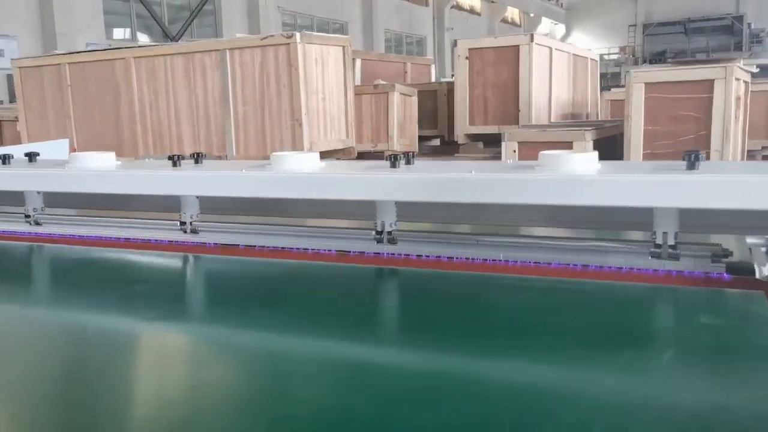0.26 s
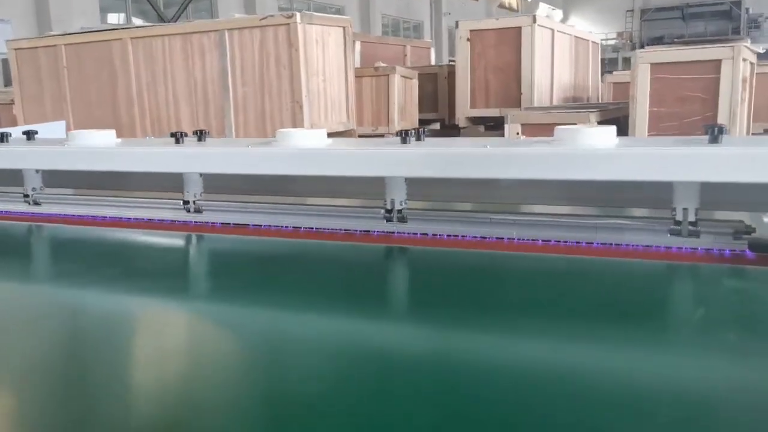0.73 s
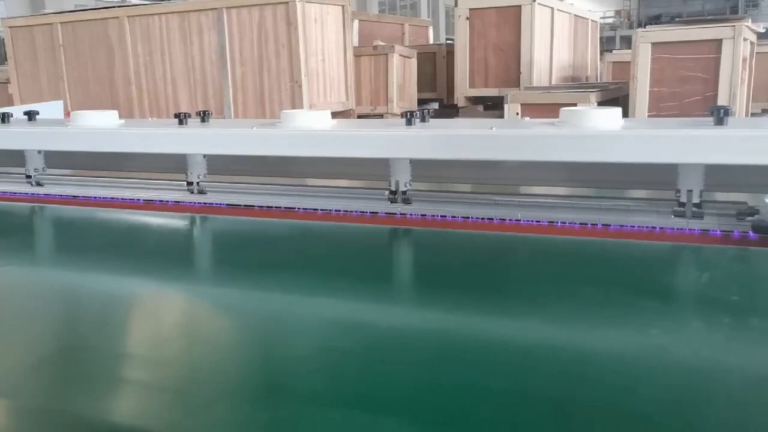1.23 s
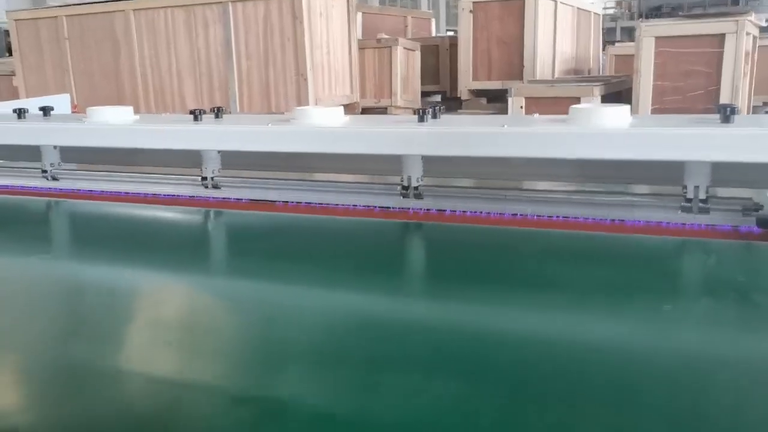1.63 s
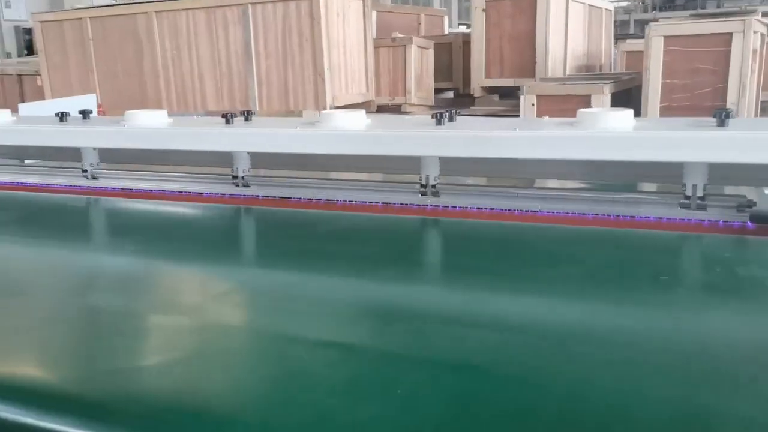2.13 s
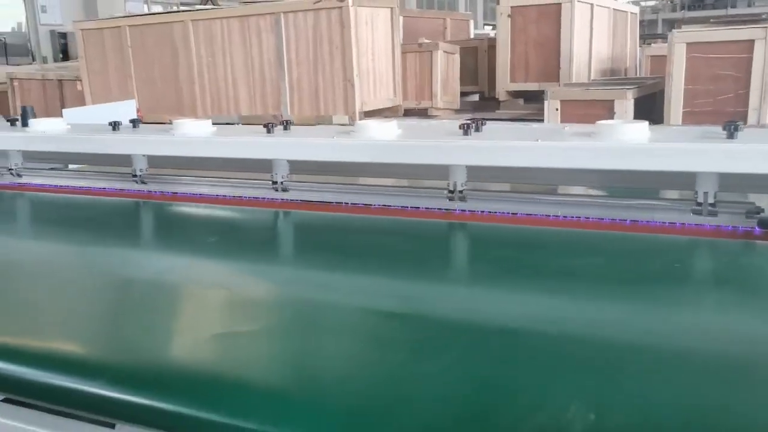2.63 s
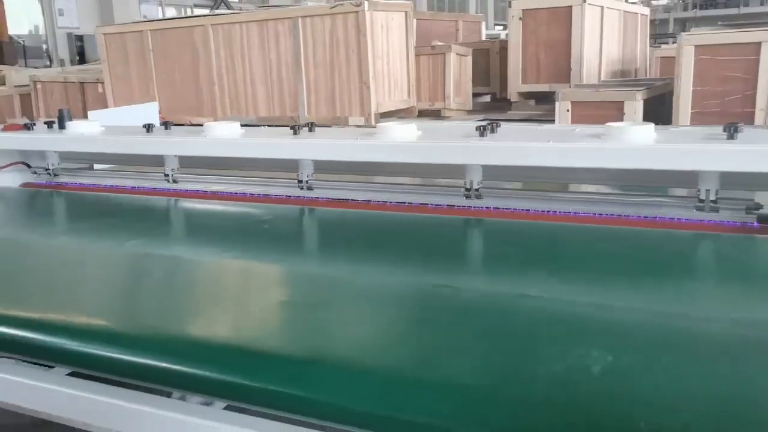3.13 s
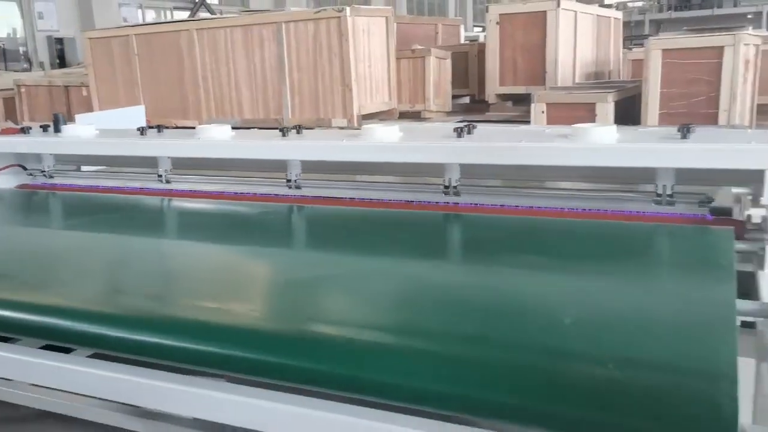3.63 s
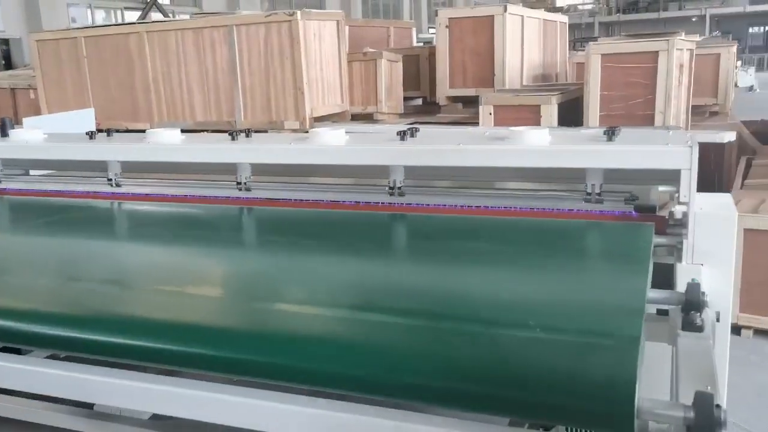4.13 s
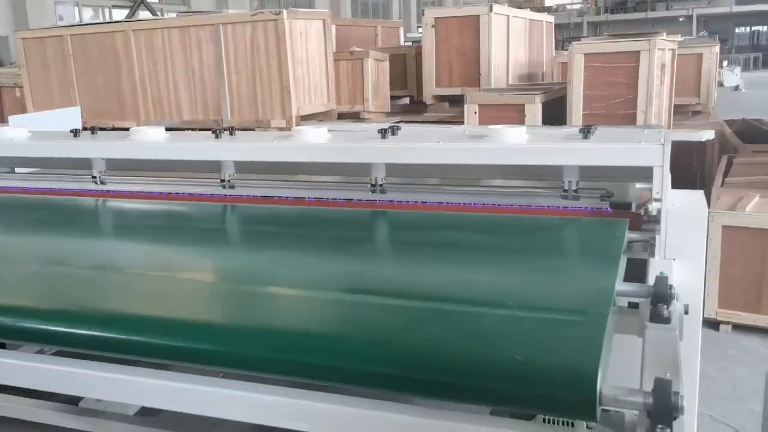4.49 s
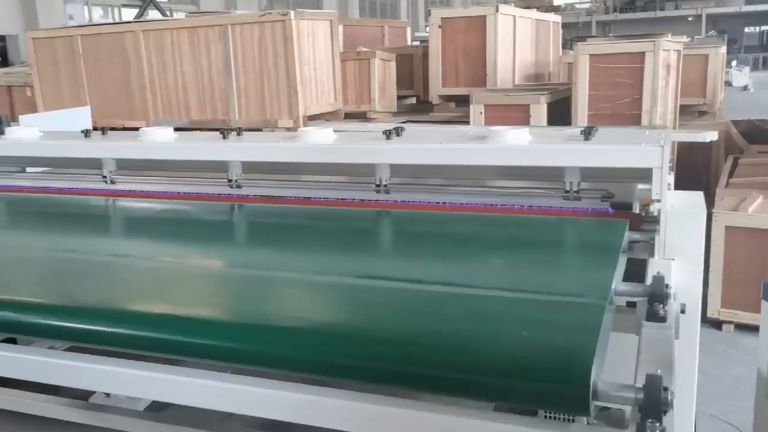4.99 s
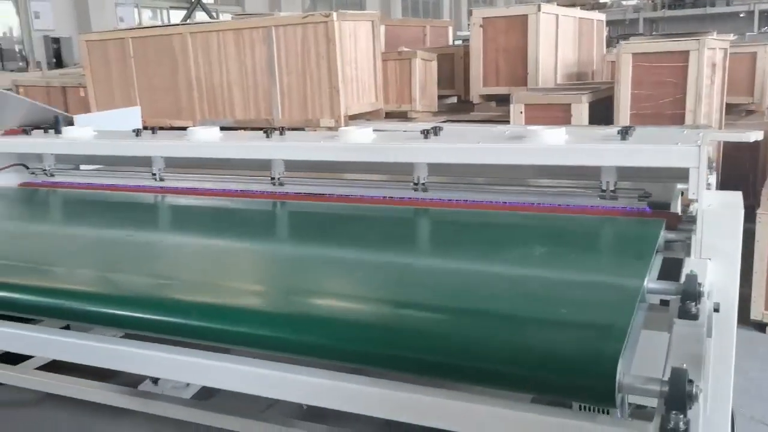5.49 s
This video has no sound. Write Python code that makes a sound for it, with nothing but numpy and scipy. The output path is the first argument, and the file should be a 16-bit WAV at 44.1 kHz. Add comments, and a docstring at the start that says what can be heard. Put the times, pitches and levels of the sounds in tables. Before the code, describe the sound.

A steady electrical hiss and piercing thin whine fill a factory hall; wind buffets the microphone, then three echoing air nailer shots ring out.

```python
"""Corona discharge and air nailer in a factory hall

A corona treater runs in a large hall: random snaps along its electrode make the hiss, a swept tone with
overlapping reflections makes the generator's whine, and drifting sines over filtered noise make the motors' hum.
Air buffets the moving hand-held microphone, as filtered noise and short, steepened sine pulses, one a handling knock.
An air nailer fires three times into a crate: blows ring damped modes, decaying noise fills the hall,
and a puff of exhaust follows each shot."""
import sys
import numpy as np
from scipy import signal
from scipy.fft import rfft, irfft
from scipy.io import wavfile
from scipy.ndimage import uniform_filter1d, minimum_filter1d

SR = 44100
rng = np.random.default_rng(int(sys.argv[2]) if len(sys.argv) > 2 else 0)


def transcribe(u):
    """Save the signal u as a 16-bit wav file named by the first command-line argument.

    u: samples, shape (n,) or (channels, n), limited to [-1, 1]; the rate is SR.
    q: integer samples, one column per channel.
    """
    v = np.clip(np.atleast_2d(u).T, -1, 1)
    q = np.round(v * 32767).astype(np.int16)
    wavfile.write(sys.argv[1], SR, q)


N = 253575
T = np.arange(N) / SR  # time_s
FREQ = np.maximum(np.fft.rfftfreq(2 * N, 1 / SR), 1)  # frequency_hz, padded to twice the length

# Whine level, balance and directness over time, with a sudden drop after the first shot;
# levels before an overall trim: time_s, level_db, left_minus_right_db, direct_over_reflected_db
WHINE_LEVEL = [(0, -17, -6, -14), (.7, -15.5, -2.5, -5), (1.2, -17.5, -7.5, -9), (1.5, -15, -4.5, -5),
               (1.85, -16.5, 1, 5), (2.3, -17.5, -3, -1), (2.65, -19, -1, 1), (3.05, -21, 0, 0.5),
               (3.51, -19, 1, -11), (3.55, -24.5, 1, 1), (4.4, -25, 0, -15), (5.1, -23, -3.5, -16),
               (5.75, -24, 2.5, -14)]
# Middle of the generator's drifting sweep: time_s, centre_hz
SWEEP_CENTRE = [(1.3, 12295), (2.1, 12365), (4, 12330), (5.75, 12375)]
# How openly the spark gap faces the microphone: time_s, sizzle_level_db
GAP_FACING = [(0, -31), (.35, -29), (1.2, -27), (1.35, -27), (1.52, -32.5), (2.8, -32), (3.3, -34),
              (3.9, -33), (5.75, -33)]
# Relative spectra of the hiss and of the sizzle: frequency_hz, gain_db
HISS_SPECTRUM = [(300, 5), (1000, -8.5), (1600, 5.5), (2400, 6.5), (3100, 4), (4000, 1.5), (7000, 1),
                 (11000, 1.5), (16000, 4.5), (19000, -47)]
SIZZLE_SPECTRUM = [(500, -15), (1150, 9), (1400, 2.5), (1700, 9.5), (3500, -1), (5000, 5), (7500, 0.5),
                   (9000, -5), (10300, 1.5), (13000, 0), (16000, -12), (19000, -25)]
# Motors and blowers, levels before an overall trim: frequency_hz, level_db
MOTOR_TONES = [(226.1, -50), (301.5, -49.5), (452.2, -54), (532.9, -53), (630.5, -47.5), (720, -56.5),
               (829.0, -47), (899.0, -53), (931.3, -47), (1200, -50), (1798, -53.5)]
# Motors and blowers as the microphone moves past them: time_s, gain_db
MOTOR_NEARNESS = [(0, 4.5), (1.4, 4), (2.0, 1), (3.2, 0.5), (4.2, 3), (5.75, 2)]
# Relative spectrum of the hall's rumble: frequency_hz, gain_db
RUMBLE_SPECTRUM = [(20, -38), (55, -12), (160, -10), (260, 3), (430, -6.5), (620, 2.5), (760, -2),
                   (900, 4.5), (1030, -5), (1190, 6), (1400, -3.5), (3000, -17), (8000, -50)]
# Relative spectrum of air on the ports: frequency_hz, gain_db
DRAUGHT_SPECTRUM = [(15, -40), (25, -23), (38, 1.5), (65, 1.5), (135, -1), (250, -16), (450, -31),
                    (900, -28), (3000, -70)]
# Single buffets of air and one handling knock (at 1.831 s), each with a nominal pitch:
# centre_s, level_db, left_minus_right_db, pitch_hz
THUDS = [(.32, -27, 18, 86.3), (.8, -24.5, 14, 65.6), (.84, -24, 17, 80.7), (1.826, -23.5, 17, 142),
         (1.831, -19, 17, 476), (2.105, -26.5, 17, 104), (2.135, -23, 22, 198), (2.398, -18.5, 24, 112.4),
         (2.445, -24, 20, 148.5), (2.514, -20.5, 22, 150), (2.615, -22, 16, 329.3),
         (2.677, -23.5, 18, 124.5), (2.738, -23, -17, 118), (2.767, -19, 19, 204.5), (2.826, -13, 21, 138),
         (2.842, -17.5, 18, 219), (2.857, -14.5, 13, 125), (2.871, -22, 18, 365), (2.915, -15.5, 24, 114.5),
         (2.985, -20, 14, 170), (3.014, -21, 20, 620), (3.017, -12, 26, 193.8), (3.037, -13, 22, 109),
         (3.039, -20, 18, 415), (3.09, -23, 10, 94), (3.11, -19.5, -17, 132.3), (3.138, -13, -22, 108),
         (3.185, -19, 22, 131.2), (3.28, -16.5, 22, 159.5), (3.445, -21, 14, 103), (4.585, -7.5, 29, 199.4),
         (4.588, -17, 22, 421.7), (4.61, -14.5, 28, 173)]
# Nailer shots: start_s, hall_db, singing_air_db, exhaust_delay_s, exhaust_db, exhaust_rise_s, piston_tap_db
NAILER_SHOTS = [(3.523, -18, -38, 0.22, -20, 0.0017, -1.5), (4.387, -17, -27.5, 0.21, -19, 0.013, -22),
                (5.237, -17, -37, 0.21, -19.5, 0.016, -20)]
# Blows of each shot, from trigger valve to seated nail: start_s, relative_level_db
NAILER_BLOWS = [(3.499, -27), (3.523, -20.5), (3.5307, -9.5), (3.537, -16.5), (4.365, -26), (4.3884, -12.5),
                (4.394, -15), (4.398, -13), (5.214, -30), (5.239, -15), (5.2434, -21.5), (5.2475, -10.5),
                (5.254, -27)]
# Modes of nailer body and crate board, struck at a new spot each time, relative levels:
# frequency_hz, width_hz, left_minus_right_db, first_shot_db, second_shot_db, third_shot_db
BODY_MODES = [(185, 270, 6, 5, 8, 7.5), (400, 114, 2, 15, 17.5, 17), (944, 100, 19, 5, 14.5, 11),
              (1270, 110, 11, 4, 3, 2), (1783, 120, -10, 12.5, 19, 15.5), (2303, 79, -3, 15, 19.5, 23.5),
              (2797, 105, -21, 9, 13, 15.5), (3603, 84, -23, 10, 15, 16.5), (3890, 88, -11, 9, -2, -6),
              (6350, 110, 4, 0, 11, 7), (7206, 55, 11, 15, 7, 12), (8000, 130, 4, 2, 10, 11)]
# First slaps from crates and walls: delay_s, level_db
WALL_SLAPS = [(.042, -11), (.071, -18), (.113, -16.5)]
# Relative spectra of the hall's reverberation and of the exhaust: frequency_hz, gain_db
REVERB_SPECTRUM = [(50, -4), (100, -2.5), (160, 7.5), (235, 2.5), (300, 4), (420, -6), (540, -4),
                   (640, 1.5), (740, 5.5), (920, 8), (1180, 1), (1330, 4.5), (1500, 0), (2000, 2.5),
                   (2300, 4), (2650, 0), (3800, -4.5), (5300, -24), (6450, -8), (7200, -10), (16000, -21)]
EXHAUST_SPECTRUM = [(300, -41), (1500, 9.5), (3000, 9.5), (5000, 8), (8000, 10), (11000, 10.5),
                    (15800, 10.5), (19000, -13)]
# Cavity resonances of the two microphone ports: frequency_hz, left_db, right_db
PORT_RESPONSE = [(920, -5, -4.5), (1936, -8.5, -6.5), (3505, 0.5, 4.5), (4320, 6, 8), (4490, -0.5, 6),
                 (5030, -3, -6.5), (5470, 0.5, -0.5), (7960, 5.5, 4), (8600, 13, 1.5), (9070, 15.5, 7.5),
                 (9990, 2.5, 1.5), (11960, 3.5, 5), (16300, -2, 0.5)]

HALL_T60_S, HALL_T60_HIGH_S = 1.83, 1


def undb(db):
    """Level: decibels become an amplitude ratio."""
    return 10 ** (np.asarray(db) / 20)


def unit(x):
    """Normalisation: the signal is scaled to rms 1."""
    return x / np.sqrt(np.mean(x ** 2))


def curves(rows):
    """Linear interpolation: each column of a table becomes a function of time."""
    s, *columns = np.transpose(rows)
    return [np.interp(T, s, c) for c in columns]


def place(db, pan_db):
    """Stereo level difference: left and right gains share a constant total power."""
    pair = undb(np.array([pan_db, -pan_db]).reshape(2, -1) / 2)
    return undb(db) * pair / np.sqrt(np.mean(pair ** 2, axis=0))


def shape(x, response):
    """Linear filtering: the spectrum is multiplied by a frequency response."""
    return irfft(rfft(x, 2 * N) * response)[..., :N]


def colour(x, points):
    """Spectral colouring: gain in dB runs straight between points on a log frequency axis."""
    hz, db = np.transpose(points)
    return shape(x, undb(np.interp(np.log(FREQ), np.log(hz), db)))


def resonance(hz, width):
    """Damped resonance: the response of one mode peaks at hz with the given width."""
    return 1 / (1 + 1j * hz / width * (FREQ / hz - hz / FREQ))


def noise():
    """Incoherence: unrelated white noise at the two ports."""
    return rng.standard_normal((2, N))


def diffuse(alike_hz=950):
    """Diffuse field: long waves reach both ports largely alike, short waves independently."""
    likeness = .8 / (1 + (FREQ / alike_hz) ** 6)
    mid, side = shape(noise(), np.sqrt([1 + likeness, 1 - likeness]))
    return np.array([mid + side, mid - side]) / np.sqrt(2)


def walk(rate):
    """Random modulation: held random values, smoothed twice, wander with rms 1."""
    k = max(int(SR / rate), 2)
    held = np.repeat(rng.standard_normal(N // k + 1), k)
    return unit(uniform_filter1d(uniform_filter1d(held, k), k)[:N])


def burst(start, rise_s, t60):
    """Exponential decay: an envelope rises and then falls by 60 dB in each t60."""
    age = np.maximum(T - start, 0)
    return (1 - np.exp(-age / rise_s)) * undb(-60 * np.minimum(age / t60, 4))


def whine(sweep_hz=44.28, swing_hz=210, uneven=.1, hunt_hz=38, flutter_db=1.0,
          shortest_path_s=.003, longest_path_s=.07, sway_s=.00003, count=12,
          skirt_db=-14, skirt_hz=300, trim_db=-0.8, dip_s=2.03, dip_width_s=.013, dip_db=-8):
    """Multipath interference: a swept tone and its delayed reflections overlap into a shimmer."""
    db, pan_db, direct_db = curves(WHINE_LEVEL)
    (centre_hz,) = curves(SWEEP_CENTRE)
    sweep_phase = 2 * np.pi * np.cumsum(sweep_hz * (1 + uneven * walk(25))) / SR
    sweep = signal.sawtooth(sweep_phase, .5)  # triangle wave
    # the uneven spark load tugs at the pitch
    pitch_hz = centre_hz + swing_hz * sweep + hunt_hz * walk(400)
    phase = 2 * np.pi * np.cumsum(pitch_hz) / SR

    def path(delay_s):
        """Doppler effect: every sway of the hand changes the path length to each port."""
        sent = [np.abs(T - delay_s + sway_s * walk(12)) for _ in range(2)]
        return np.sin(np.interp(sent, T, phase)) * undb(flutter_db * np.interp(sent, T, sweep))

    spread = (np.arange(count) + .5 * rng.random(count)) / count
    delays_s = shortest_path_s + (longest_path_s - shortest_path_s) * spread
    reflected = unit(sum(path(delay_s) for delay_s in delays_s))
    direct = undb(direct_db) * unit(path(0))
    tone = (direct + reflected) / np.hypot(undb(direct_db), 1)
    # stray sparks spread a skirt around the tone
    skirt = unit(shape(noise(), 1 / np.hypot(1, (FREQ - centre_hz.mean()) / skirt_hz)))
    # the whine dips briefly
    brief_dip_db = dip_db * np.exp(-((T - dip_s) / dip_width_s) ** 2)
    return (tone + undb(skirt_db) * skirt) * place(db + trim_db + brief_dip_db, pan_db)


def sparks(per_second, scatter_db):
    """Shot noise: dense tiny snaps of uneven size fall at random instants."""
    struck = rng.random((2, N)) < per_second / SR
    return struck * noise() * undb(scatter_db * rng.standard_normal((2, N)))


def discharge(flicker_db=0.5, surge_db=1.1, sizzle_pan_db=1.0,
              hiss_db=-27.5, drop_s=3.6, drop_length_s=0.25, drop_db=-2):
    """Corona discharge: random snaps sum to a hiss, with a sharper sizzle where the gap is in plain view."""
    (facing_db,) = curves(GAP_FACING)
    # the hiss drops slightly once, as if the recorder turned its gain down
    dropped = np.clip((T - drop_s) / drop_length_s, 0, 1)
    hiss = unit(colour(sparks(28000, 0.5), HISS_SPECTRUM)) * undb(hiss_db + drop_db * dropped)
    sizzle = unit(colour(sparks(8000, 2.4), SIZZLE_SPECTRUM))
    sizzle = sizzle * place(facing_db + surge_db * walk(20), sizzle_pan_db)
    return (hiss + sizzle) * undb(flicker_db * walk(45))


def machinery(trim_db=-0.47, drift_hz=0.72, phase_wander_rad=0.24, rumble_db=-40.0, boom_hz=380):
    """Superposition: motor tones of drifting phase lie over a rumble whose bass is the same everywhere."""
    (near_db,) = curves(MOTOR_NEARNESS)
    rumble = unit(colour(diffuse(), RUMBLE_SPECTRUM)) * undb(rumble_db)
    boom = shape(rumble, 1 / (1 + (FREQ / boom_hz) ** 4))
    near = rumble - boom
    for hz, db in MOTOR_TONES:
        phase = 2 * np.pi * np.cumsum(hz + drift_hz * walk(4.954)) / SR
        # the phase wanders separately at each port in the hall's standing waves
        tones = [np.sin(phase + phase_wander_rad * walk(2.15)) for _ in range(2)]
        near = near + undb(db + trim_db) * np.array(tones)
    return boom + near * undb(near_db)


def airflow(patchy_db=6, draught_db=-43.5, draught_pan_db=8, calm_s=3.4, calm_db_per_s=12,
            gust_db=-27.5, gust_pan_db=4.5, gust_full_s=2.82, gust_hold_s=0.47,
            rise_left_db_per_s=18, rise_right_db_per_s=88, fall_db_per_s=33):
    """Turbulent flow: strength at each port joins a patchy draught to a gust that swells, holds and fades."""
    # the draught weakens as the microphone leaves the moving air
    calm_db = calm_db_per_s * np.maximum(T - calm_s, 0)
    light = place(draught_db + patchy_db * np.tanh(walk(9.45)) - calm_db, draught_pan_db)
    # the sheltered right port catches the gust late and abruptly
    rise_db = np.outer([rise_left_db_per_s, rise_right_db_per_s], np.minimum(T - gust_full_s, 0))
    fall_db = fall_db_per_s * np.maximum(T - gust_full_s - gust_hold_s, 0)
    return np.hypot(light, place(gust_db + rise_db - fall_db, gust_pan_db))


def draught(gust_db=4.0, strong_db=-27, tear_db=-9, tear_hz=220, tear_width_hz=280, tear_growth=0.34):
    """Eddy pressure: eddies push on each port separately; the strongest tear into a brighter flutter."""
    flow = airflow()
    gust = unit(undb(gust_db * np.tanh([walk(45), walk(45)])))
    rumble = unit(colour(noise(), DRAUGHT_SPECTRUM)) * gust
    tear = unit(shape(noise(), resonance(tear_hz, tear_width_hz) ** 2) * gust ** 2.0)
    # faster air sheds smaller eddies
    tear = tear * undb(tear_db) * np.minimum(flow / undb(strong_db), 1) ** tear_growth
    return (rumble + tear) * flow


def thuds(cycles=0.6, unsteady=0.251, steepen=0.44):
    """Wave steepening: each thud is a Gaussian pulse of a few swings with a steepened waveform."""
    out = 0
    for s, db, pan_db, hz in THUDS:
        near = np.abs(T - s) < .06
        age = T[near] - s
        wander = unit(uniform_filter1d(rng.standard_normal(N // 40), size=110))[:len(age)]
        pitch_hz = hz * np.exp(unsteady * wander)
        phase = 2 * np.pi * (rng.random() + np.cumsum(pitch_hz) / SR)
        thud = np.zeros(N)
        thud[near] = np.sin(phase + steepen * np.sin(phase)) * np.exp(-.5 * (age * hz / cycles) ** 2)
        out = out + thud * place(db, pan_db)
    return out


def strikes(shot, knock_db=21, crack_db=-4, rattle_rise_s=0.00044, rattle_t60=0.074, rattle_db=-6):
    """Modal excitation: impulses and brief rattles ring tool and board; returns the ring and the bare crack."""
    blows = [(s, db) for s, db in NAILER_BLOWS if abs(s - NAILER_SHOTS[shot][0]) < .1]
    body = 0
    for k, (hz, width, pan_db, *db) in enumerate(BODY_MODES):
        # neighbouring modes have opposite signs
        body = body + (-1) ** k * place(db[shot], pan_db) * resonance(hz, width)
    body = body / np.sqrt(np.mean(np.abs(body) ** 2))
    knocks = sum(undb(db + knock_db) * (np.arange(N) == int(s * SR)) for s, db in blows)
    rattle = diffuse() * sum(undb(db + rattle_db) * burst(s, rattle_rise_s, rattle_t60) for s, db in blows)
    blow = knocks + rattle
    return shape(blow, body), undb(crack_db) * blow


def reflections(x, per_second=260, first_s=0.039, t60=1.0, scatter_level_db=-4, dull_hz=4500):
    """Discrete echoes: first slaps, and scattered, duller echoes from crates and pillars."""
    arrivals = rng.random((2, N)) < per_second / SR
    paths = arrivals * np.sign(noise()) * burst(first_s, .002, t60)
    paths = paths * undb(scatter_level_db) / np.sqrt(np.sum(paths ** 2) / 2)
    scattered = shape(x, rfft(paths, 2 * N) / (1 + (FREQ / dull_hz) ** 6))
    slaps = sum(undb(db) * np.roll(x, int(delay_s * SR), axis=1) for delay_s, db in WALL_SLAPS)
    return scattered + slaps


def nailer(echo_delay_s=0.024, echo_rise_s=0.016, echo_pan_db=-0.66, damp_hz=4500, patchy_db=1.0,
           sing_hz=6450, sing_width_hz=480, sing_t60=1.0, sing_patchy_db=3.1,
           exhaust_t60=0.39, exhaust_echo_db=-15, tap_rise_s=.002, tap_t60=0.011):
    """Impact and reverberation: each shot fills the hall; air sings in the tool; the piston taps home and vents."""
    # reflections arrive in clumps
    echo = unit(colour(diffuse(), REVERB_SPECTRUM) * undb(patchy_db * walk(90)))
    echo_low = shape(echo, 1 / (1 + (FREQ / damp_hz) ** 4))
    air = unit(colour(noise(), EXHAUST_SPECTRUM))
    sing = unit(shape(noise(), resonance(sing_hz, sing_width_hz) ** 2) * undb(sing_patchy_db * walk(45)))
    ring, crack = np.sum([strikes(shot) for shot in range(len(NAILER_SHOTS))], axis=0)
    out = ring + crack + reflections(ring)
    for s, hall_db, sing_db, wait_s, exhaust_db, rise_s, tap_db in NAILER_SHOTS:
        echo_s, vent_s = s + echo_delay_s, s + wait_s
        # the air of the hall swallows the treble first
        for band, t60 in ((echo_low, HALL_T60_S), (echo - echo_low, HALL_T60_HIGH_S)):
            out = out + band * burst(echo_s, echo_rise_s, t60) * place(hall_db, echo_pan_db)
        out = out + sing * undb(sing_db) * burst(echo_s, echo_rise_s, sing_t60)
        vent = burst(vent_s, rise_s, exhaust_t60)
        vent = vent + undb(exhaust_echo_db) * burst(vent_s, echo_rise_s, HALL_T60_HIGH_S)
        tap = undb(tap_db) * burst(vent_s, tap_rise_s, tap_t60)
        out = out + air * (undb(exhaust_db) * vent + tap)
    return out


def scene():
    """Superposition: the pressures of all sources add at the microphone."""
    return whine() + discharge() + machinery() + draught() + thuds() + nailer()


def limiter(x, threshold_db=-14.0, hold_s=.024, release_s=0.044, deaf_hz=9500):
    """Gain control: loud sound below deaf_hz turns the level down at once; it holds, then recovers."""
    sensed = shape(x, FREQ < deaf_hz)
    power = uniform_filter1d(np.mean(sensed ** 2, axis=0), size=260)
    over_db = np.maximum(10 * np.log10(np.maximum(power, 1e-9)) - threshold_db, 0)
    k = int(hold_s * SR)
    held_db = -minimum_filter1d(-over_db, k, origin=(k - 1) // 2)  # maximum over the past
    pole = np.exp(-1 / (release_s * SR))
    released_db = signal.lfilter([1 - pole], [1, -pole], held_db)
    return x * undb(-np.maximum(held_db, released_db))


def record(dry, low_cut_hz=38, top_hz=15900):
    """Transduction: port resonances, bass cut, limiter, full-scale clipping and top cut act in turn."""
    ports = np.array(PORT_RESPONSE)
    heard = np.array([colour(x, np.column_stack([ports[:, 0], db])) for x, db in zip(dry, ports.T[1:])])
    heard = signal.sosfilt(signal.butter(3, low_cut_hz, "highpass", fs=SR, output="sos"), heard)
    top_cut = signal.ellip(10, .1, 80, top_hz, fs=SR, output="sos")
    return signal.sosfilt(top_cut, np.clip(limiter(heard), -1, 1))


dry = scene()
out = record(dry)
transcribe(out)
```